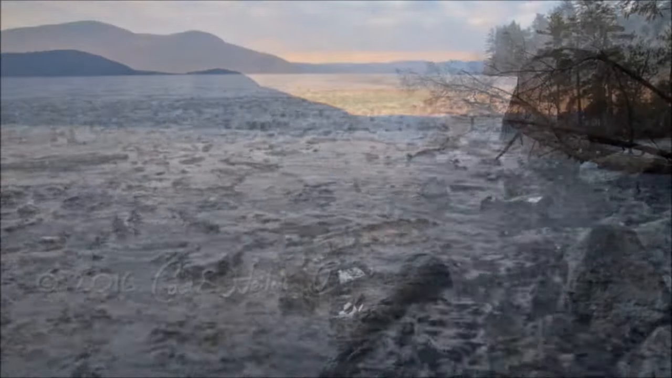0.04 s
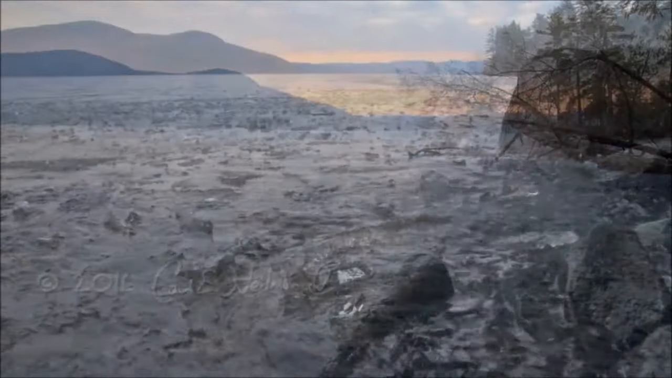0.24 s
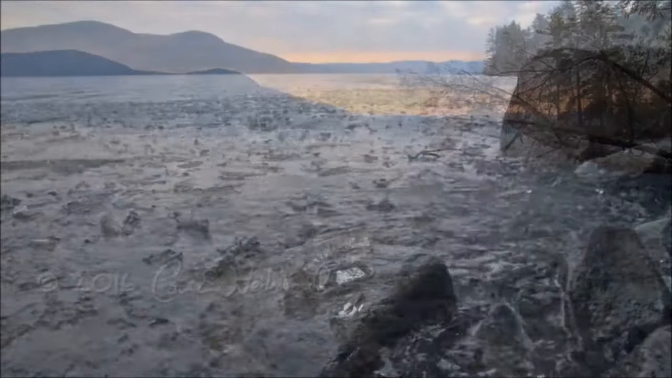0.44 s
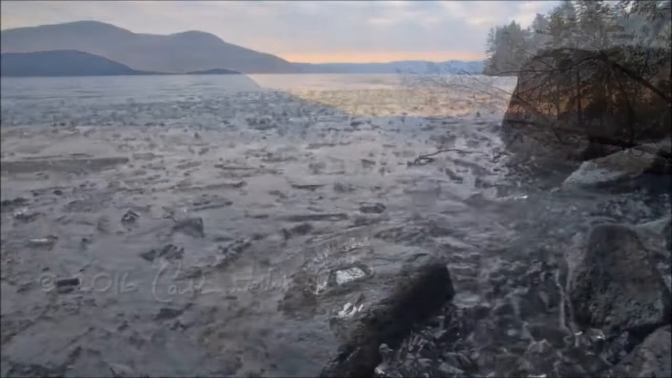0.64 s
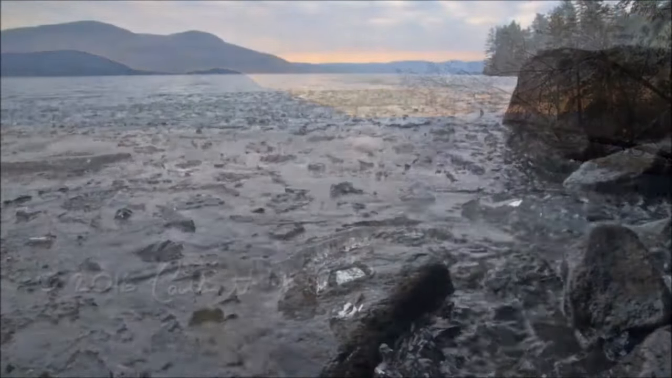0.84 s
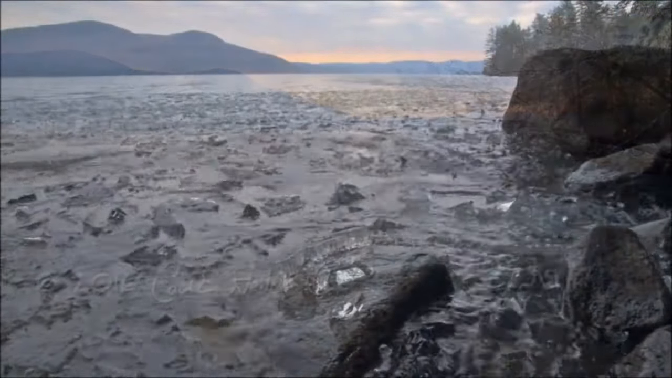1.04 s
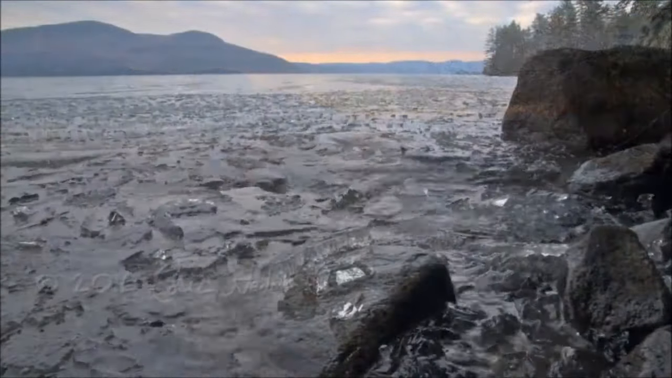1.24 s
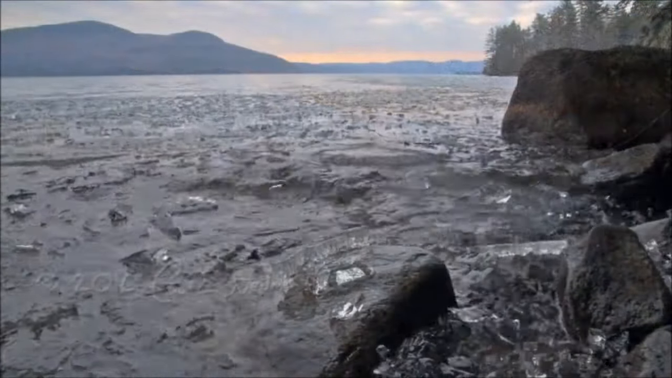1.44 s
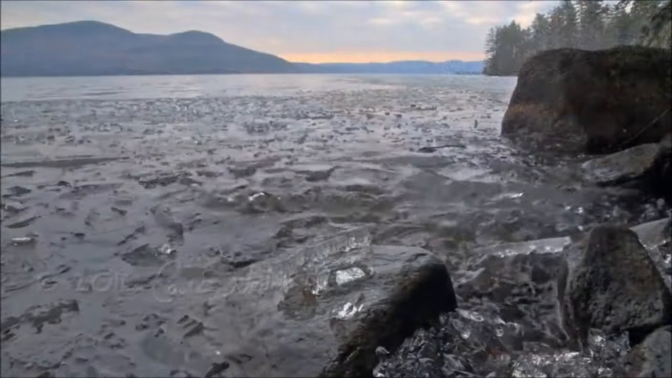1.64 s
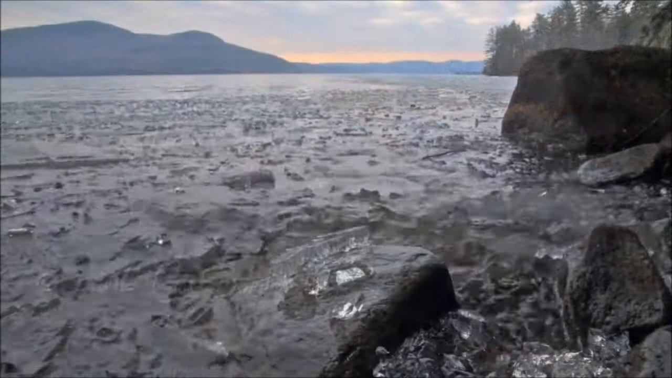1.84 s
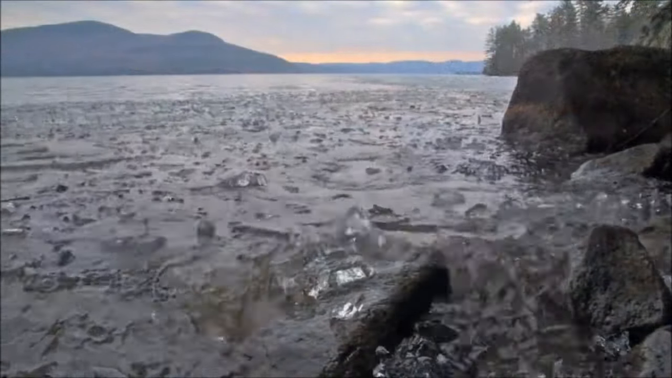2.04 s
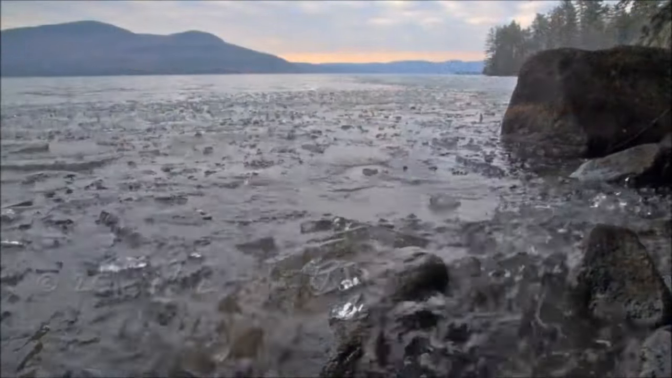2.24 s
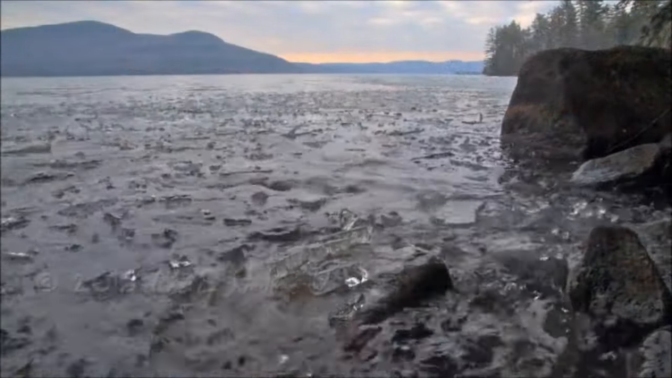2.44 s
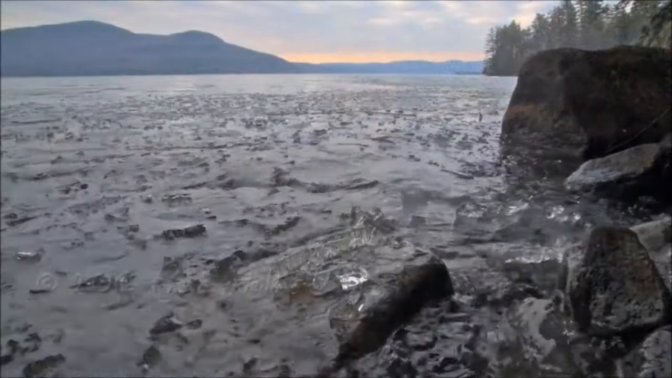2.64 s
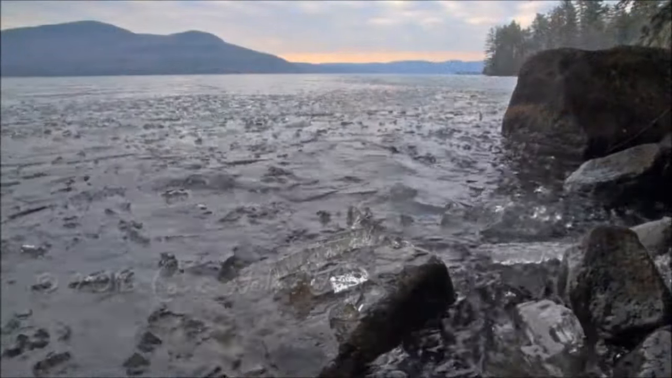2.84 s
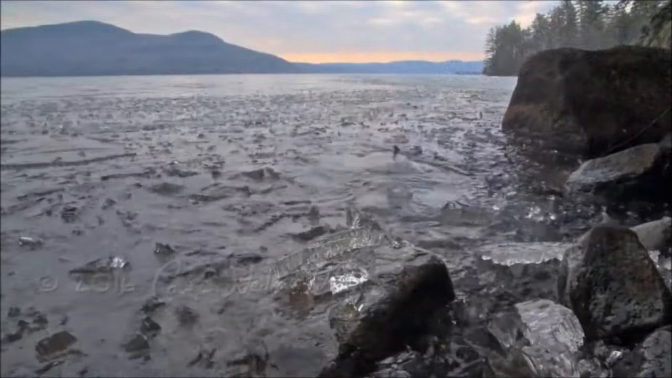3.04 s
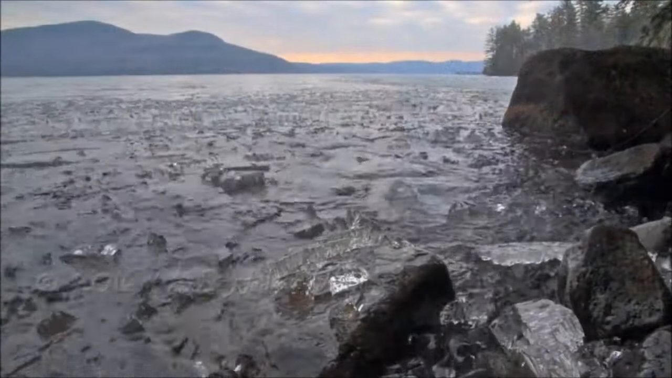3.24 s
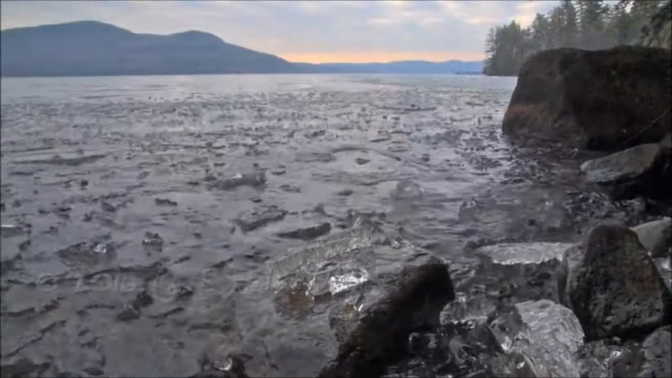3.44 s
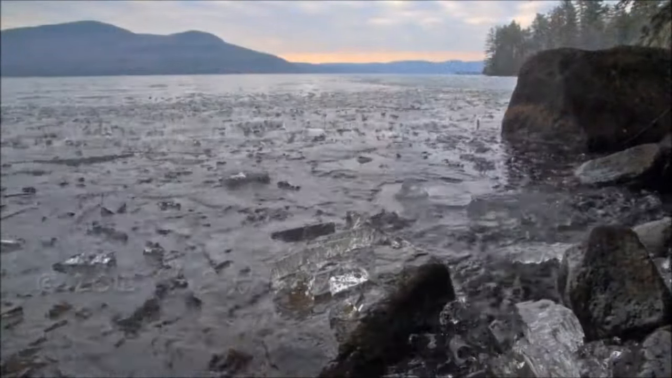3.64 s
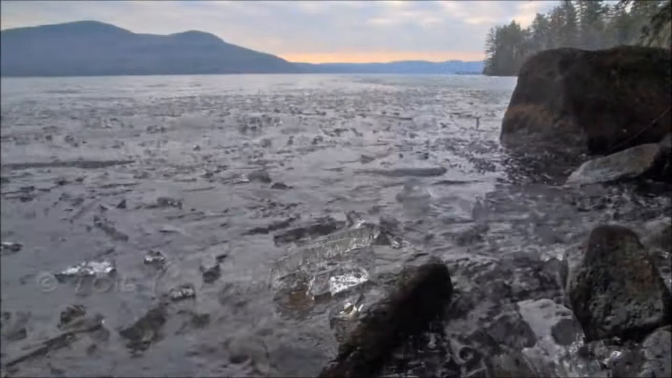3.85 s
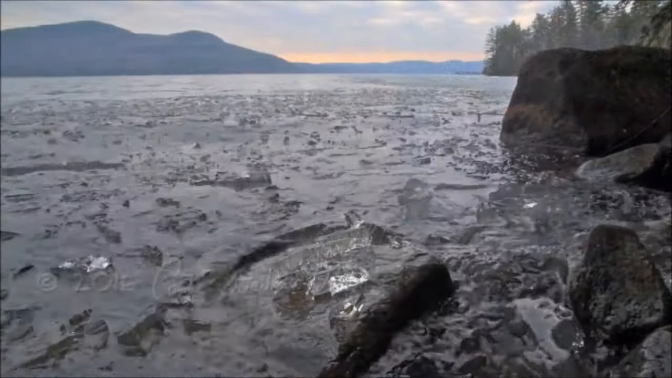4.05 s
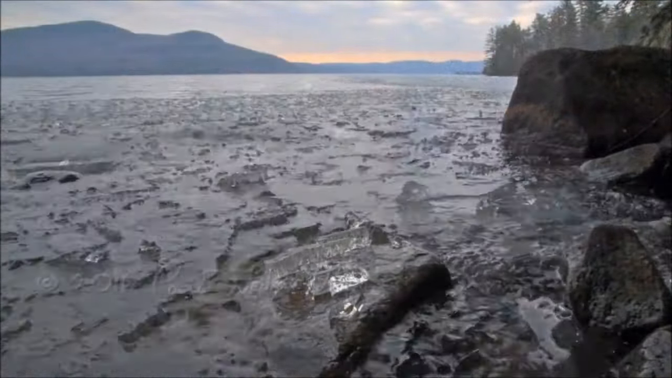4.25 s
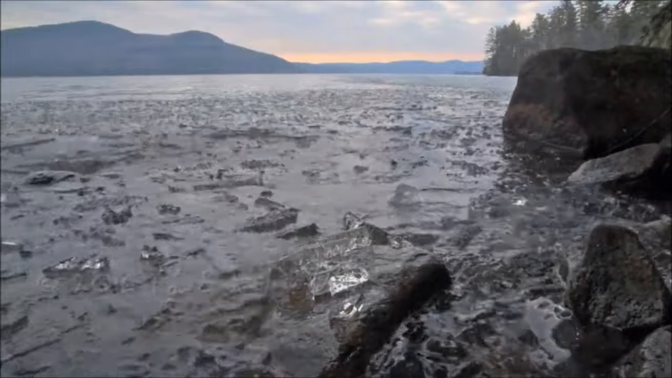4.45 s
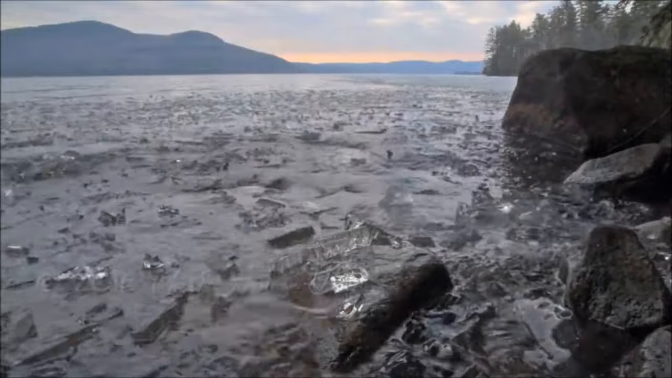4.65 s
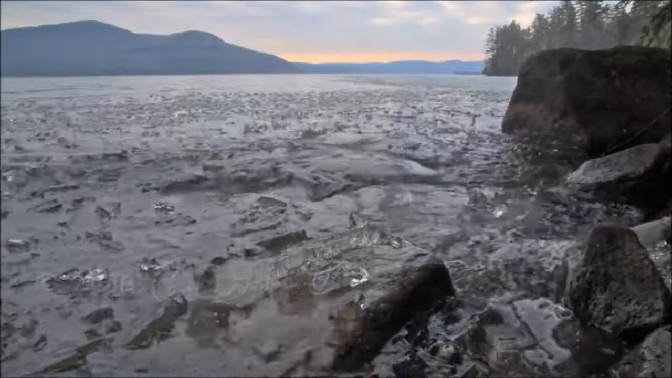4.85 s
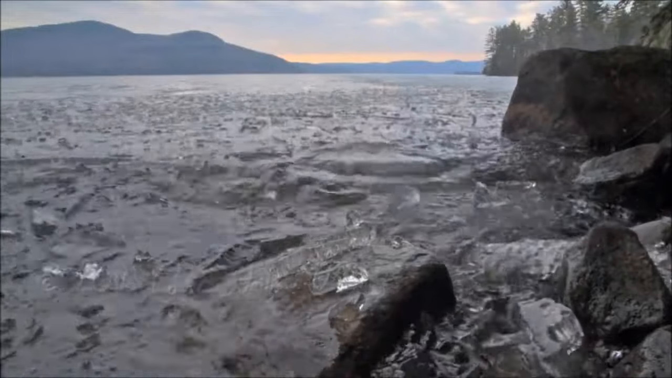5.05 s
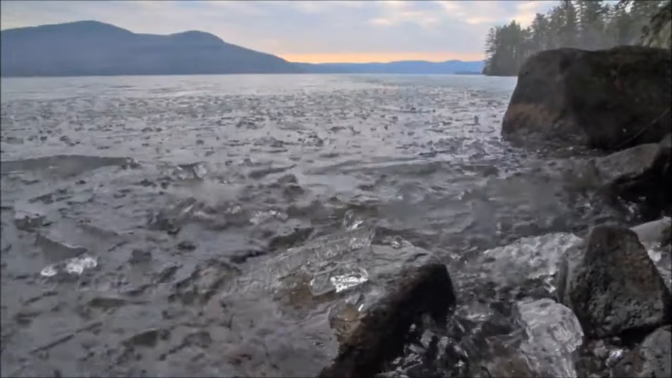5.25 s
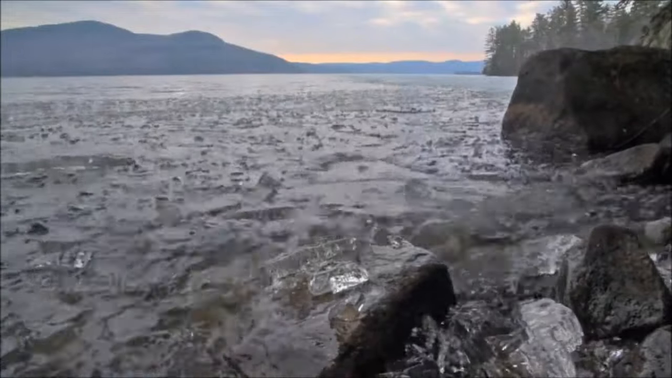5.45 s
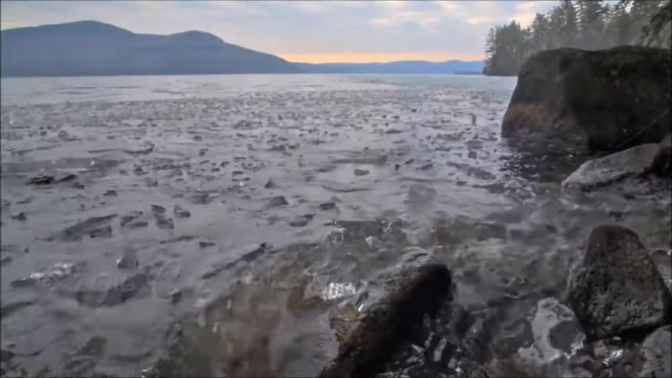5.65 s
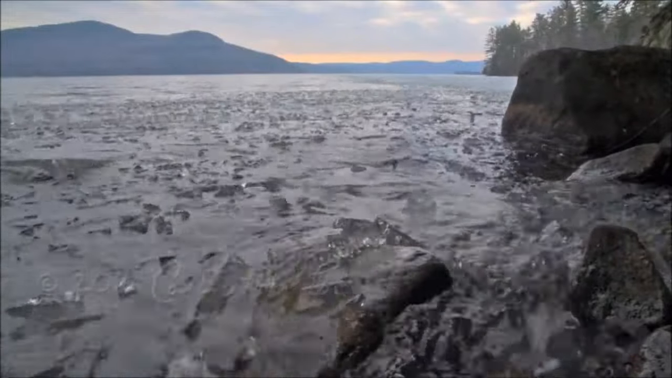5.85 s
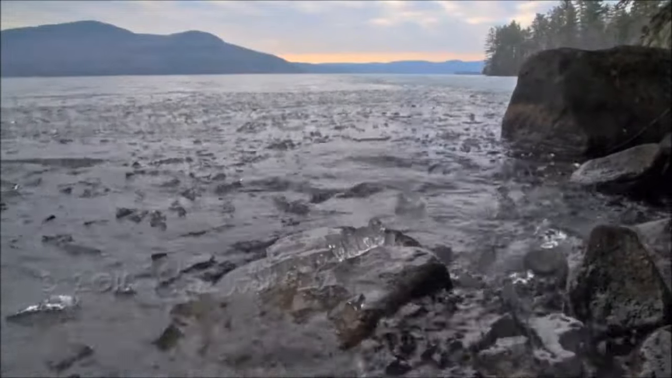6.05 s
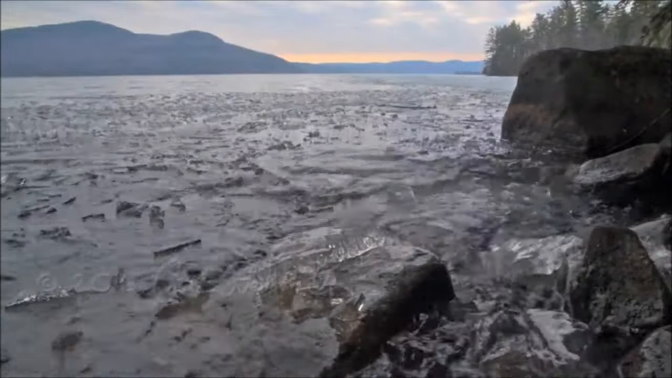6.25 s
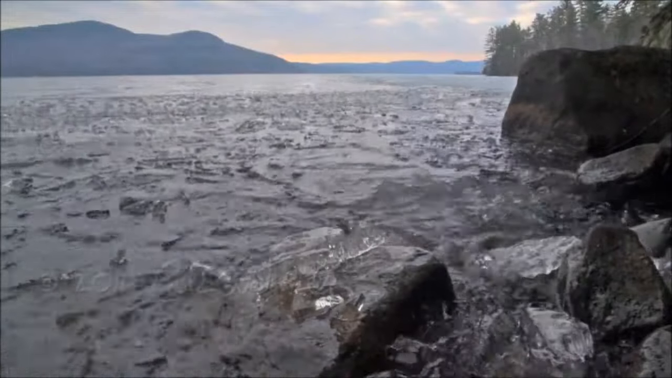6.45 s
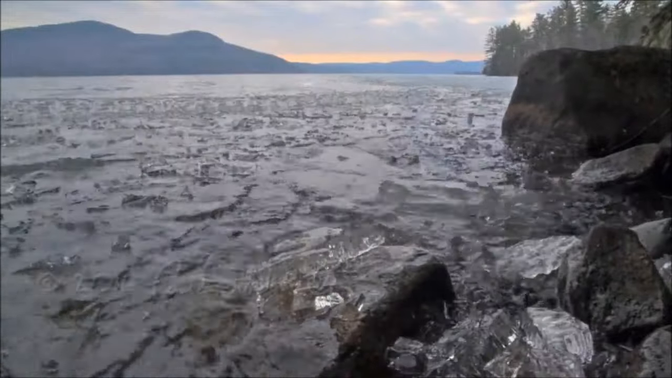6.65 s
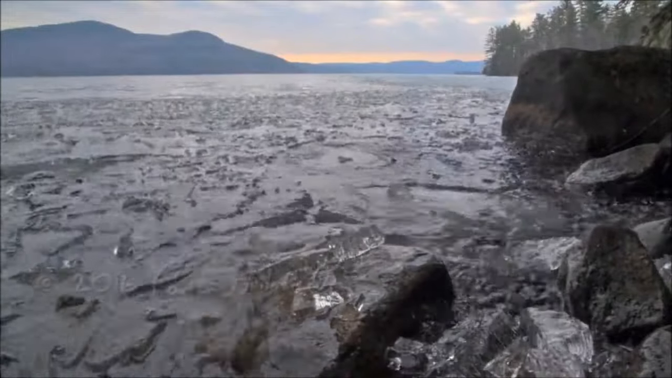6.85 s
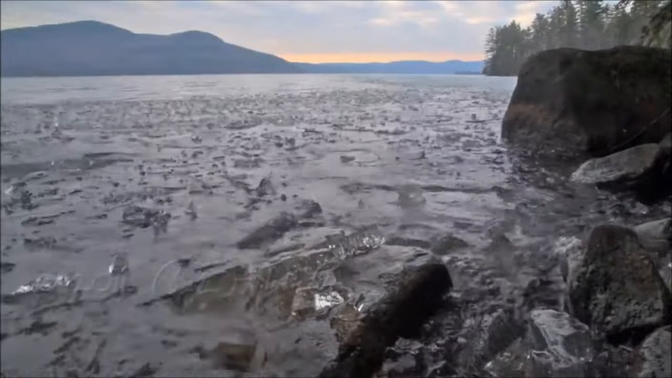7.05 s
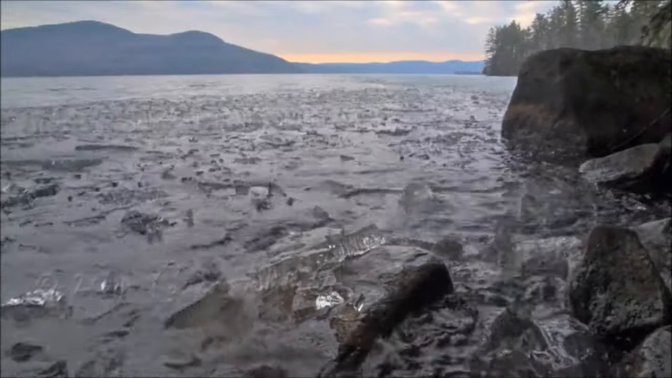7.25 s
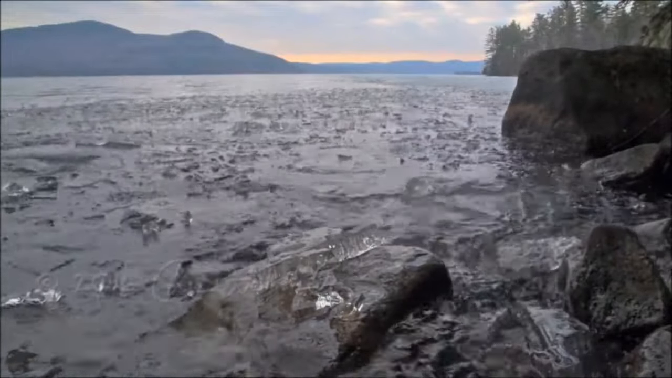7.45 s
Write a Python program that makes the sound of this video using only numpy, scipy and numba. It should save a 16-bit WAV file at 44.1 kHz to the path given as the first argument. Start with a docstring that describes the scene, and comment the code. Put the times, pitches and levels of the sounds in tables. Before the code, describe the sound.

Countless thin ice needles tinkle and rustle on a lake edge, swelling with each wavelet, while water gurgles and slaps softly between stones.

```python
"""A rocky lake shore: small waves push loose candle ice against the stones, before two spaced microphones.
Thousands of ice needles and thicker shards knock together, each a short dying sine; waves bring more.
Near crystals chime as ringing rods; knocks and smacks are a crack, a burst of noise and a short ring.
Underneath, water laps between the rocks: coloured noise, and trapped bubbles that plop with gliding pitch."""
import sys
import numpy as np
from scipy import signal
from scipy.fft import rfft, irfft
from scipy.io import wavfile
from scipy.ndimage import uniform_filter1d
from numba import njit

SR = 44100
rng = np.random.default_rng(int(sys.argv[2]) if len(sys.argv) > 2 else 0)


def output_pcm(signal):
    """Save a mono or channel-first signal as 16-bit PCM at the path in sys.argv[1].

    Samples are clipped to [-1, 1] before scaling.
    """
    pcm = np.clip(np.atleast_2d(signal).T, -1, 1) * 32767
    wavfile.write(sys.argv[1], SR, np.round(pcm).astype(np.int16))


N = 331191


def gain_of(db):
    """Turns decibels into a gain."""
    return 10 ** (np.asarray(db) / 20)


def evened(x):
    """Scales a sound to an average (rms) strength of 1."""
    return x / np.sqrt(np.mean(x ** 2) + 1e-20)


def read(points, hz):
    """Reads a table between its points, on a log-frequency axis."""
    f, value = np.transpose(points)
    return np.interp(np.log(hz + 1), np.log(f + 1), value)


def level(table, axis):
    """Turns one dB column of a time table into a gain for every sample."""
    rows = np.array(table)
    db = np.interp(np.arange(N) / SR, rows[:, 0], rows[:, axis])
    return gain_of(db)


def coloured(x, colour):
    """Filters a sound: each frequency gets the gain given in the colour table."""
    hz = np.fft.rfftfreq(N, 1 / SR)
    return irfft(rfft(x) * gain_of(read(colour, hz)), N)


def steadied(x, size):
    """Holds the slow level at 1 and keeps the quick grain; size is in samples."""
    power = (x ** 2).mean(0)
    power = uniform_filter1d(uniform_filter1d(power, size), size)
    return x / np.sqrt(abs(power) + 1e-9 * power.mean() + 1e-20)


def add(mix, s, sound):
    """Adds a stereo sound to the mix at a time in seconds."""
    first = max(round(s * SR), 0)
    part = mix[:, first:][:, :sound.shape[1]]
    part += sound[:, :part.shape[1]]


@njit
def rings(start, size, hz, t60, glide, rise):
    """Sums sines that swell over about `rise` cycles, lose 60 dB in t60 s and start to glide at octaves per s."""
    out = np.zeros(N)
    for k in range(len(start)):
        first = int(np.ceil(start[k] * SR))
        step = 2 * np.pi * hz[k] / SR
        # a spinning complex number: its imaginary part is the sine
        z = size[k] * np.exp(1j * step * (first - start[k] * SR))
        turn = np.exp(1j * step - np.log(1000) / (t60[k] * SR))
        bend = np.exp(1j * step * np.log(2) * glide[k] / SR)
        swell = 0.
        quick = 1 - np.exp(-hz[k] / (rise * SR))
        for i in range(max(first, 0), min(first + int(.8 * t60[k] * SR), N)):
            swell += (1 - swell) * quick
            out[i] += swell * z.imag
            z *= turn
            turn *= bend
    return out


MIC_LAG = 0.0003964  # s between the microphones, for a sound from straight left


def heard(s, db, hz, t60, pan_db, side, glide, rise):
    """Rings reach the nearer microphone earlier (side -1 right .. 1 left) and louder."""
    t60 = np.maximum(t60, .002)
    glide = glide * np.ones(len(s))
    balance = np.sqrt(np.cosh(pan_db * np.log(10) / 20))  # keeps the total power of both sides
    ears = []
    for ear in (1, -1):  # left, right
        arrival = s - ear * side * MIC_LAG / 2
        size = gain_of(db + ear * pan_db / 2) / balance
        ears.append(rings(arrival, size, hz, t60, glide, max(rise, .02)))
    return np.array(ears)


# how alike the two microphones hear far sounds: (frequency [Hz], likeness [0..1])
LIKENESS = [(20, .55), (60, 0.58), (130, 0.91), (300, 0.88), (700, 0.94), (1400, 0.8)]


def hiss():
    """Countless far sounds merge into a wash of noise, largely alike in both microphones at all pitches, least
    so in the deep bass."""
    same = np.clip(read(LIKENESS, np.fft.rfftfreq(N, 1 / SR)), -1, 1)
    a, b = rfft(rng.standard_normal((2, N)))
    return irfft(np.array([a, same * a + np.sqrt(1 - same ** 2) * b]), N)


def strike_times(stir, when):
    """Spreads random draws 0..1 over time, closer together where the stirring is stronger."""
    busy = np.cumsum(np.sqrt(stir))
    return np.interp(when, busy / busy[-1], np.arange(N) / SR)


def crowd(stir, count, low_hz, high_hz, t60, spread_db, width, glide, rise):
    """Random ringing bodies of all sizes; most are struck softly, a few hard."""
    when, pitch, force, damping, place, shade, bend = rng.random((count, 7)).T
    hz = low_hz + (high_hz - low_hz) * pitch
    # rings last from a quarter to four times t60, and less at high pitch
    life = t60 * 4 ** (2 * damping - 1) * np.sqrt(low_hz / hz)
    db = spread_db * np.minimum(-np.log(1 - force), 4) - 5 * np.log10(life / t60)
    width = np.clip(width, 0, 1)
    side = width * (2 * place - 1)
    pan_db = 7 * (side + width * (shade - .5))
    return heard(strike_times(stir, when), db, hz, life, pan_db, side, glide * (2 * bend - .5), rise)


def ticks(stir, count, spread_db):
    """Dry contacts: each is a few very short tones struck at once."""
    when, force, place, *pitches = rng.random((count, 7)).T
    db = spread_db * np.minimum(-np.log(1 - force), 5)
    side = 2 * place - 1
    s = strike_times(stir, when)
    life = np.full(count, .003)
    return sum(heard(s, db, 1500 + 13000 * p, life, 7 * side, side, 0, .1) for p in pitches)


LAP_RISE, LAP_FALL = .6, .9  # shares of a lap's or surge's length before and after its crest


def crests(rows, axis):
    """Power of laps or surges: each builds to its crest and drains away."""
    t, power = np.arange(0, N, 64) / SR, 0
    for row in rows:
        crest, length = row[0], row[-1]
        width = length * np.where(t < crest, LAP_RISE, LAP_FALL)
        power = power + gain_of(row[axis]) ** 2 * np.exp(-((t - crest) / width) ** 2)
    return np.interp(np.arange(N) / SR, t, power)


# how hard the slow swell stirs the floating ice: (time [s], relative level [dB])
SWELL_LEVEL = [(0, -37), (1.2, -37.5), (1.72, -33.5), (2.15, -30.5), (2.87, -29.5), (3.45, -31.5),
               (4.1, -32), (4.42, -33.5), (5.1, -31.5), (5.55, -29.5), (5.95, -28), (6.65, -27.5),
               (6.93, -31), (7.51, -31.5)]
# the raft of ice bunches up and rustles: (crest time [s], relative level [dB], length [s])
ICE_SURGES = [(0.02, -37, .04), (1.8, -34.5, .11), (2.08, -31, .08), (2.45, -28.5, .06), (2.7, -29.5, .13),
              (3.14, -27.5, .055), (3.29, -27.5, .07), (3.9, -33, .08), (4.2, -30.5, .13),
              (5.28, -28.5, .09), (5.42, -30, .07), (5.6, -30.5, .05), (6.58, -32, .06), (6.73, -28.5, .06),
              (7.18, -31, .14)]


def jostle():
    """How hard the ice is jostled: the power of the swell plus that of its surges."""
    return np.sqrt(level(SWELL_LEVEL, axis=1) ** 2 + crests(ICE_SURGES, axis=1))


# wavelets lapping into the rocks:
# (crest time [s], bubbling and shard level [relative dB], deep slosh level [relative dB], length [s])
WAVE_LAPS = [(0.45, -39.5, -57, .12), (1.38, -41.5, -46.5, .07), (1.58, -42, -53, .1),
             (1.8, -34.5, -49, .13), (2.07, -36, -58.5, .06), (2.22, -33.5, -56, .11),
             (2.44, -35.5, -49, .08), (2.87, -48, -47.5, .19), (3.12, -42, -58.5, 0.0607),
             (3.771, -36.5, -56, .09), (3.97, -36.5, -56, .045), (4.251, -42, -52, 0.11985),
             (4.56, -40, -48.5, 0.0701), (4.821, -37.5, -47, .09), (5.06, -35, -47, .11),
             (5.329, -33, -49.5, .17), (5.75, -35.5, -47, .08), (5.92, -36, -58.5, .06),
             (6.02, -33, -46, .09), (6.18, -37, -53.5, .07), (6.37, -36, -48, .16), (7.16, -36, -50, .14)]
CALM_DB = -37  # the swell between waves


def stirred(calm_db, follow, lap_db, axis):
    """A crowd grows with the jostling, and each lap adds to it by one of its level columns."""
    swell = gain_of(calm_db) * (jostle() / gain_of(CALM_DB)) ** follow
    return np.sqrt(swell ** 2 + gain_of(lap_db) ** 2 * crests(WAVE_LAPS, axis))


# where the ice is busiest: (time [s], left-right difference [dB])
ICE_LEAN = [(0, 0.5), (2.1, -1.5), (2.9, -.3), (3.35, 1.7), (5.2, 2.5), (6.3, -0.6), (6.85, 2), (7.51, 0.5)]


def drift():
    """The busiest ice shifts left and right as the waves pass."""
    lean = np.sqrt(level(ICE_LEAN, axis=1))
    return np.array([lean, 1 / lean])


def clumping(depth_db, size):
    """Crystals topple against each other in flurries: smoothed noise, over `size` samples, sways the level."""
    noise = rng.standard_normal(N)
    flurry = evened(uniform_filter1d(uniform_filter1d(noise, size), size))
    return evened(gain_of(depth_db * flurry))


# filter for the needles: (frequency [Hz], gain [dB])
NEEDLE_FILTER = [(600, -54), (2400, -14.5), (3300, -7), (4200, -10), (6400, -7), (8700, -8), (10000, -11.5),
                 (11500, -18), (13500, -22.5), (15500, -58)]


def needles(flurry):
    """Thin crystals: a fine, dense glassy fizz of tiny clinks and dry contacts, with a few longer tinkles."""
    stir = jostle()
    far = crowd(stir, count=40000, low_hz=2782, high_hz=15630, t60=.008, spread_db=2.0,
                width=1, glide=0, rise=1.5)
    near = crowd(stir, count=8000, low_hz=2800, high_hz=15000, t60=.02, spread_db=2.6,
                 width=1, glide=0, rise=2)
    ringing = crowd(stir, count=5500, low_hz=2800, high_hz=15000, t60=.06, spread_db=2.1,
                    width=1, glide=0, rise=4)
    contacts = ticks(stir, count=5000, spread_db=2.7)
    tinkle = evened(far) + gain_of(-1.5) * evened(near) + gain_of(-4) * evened(ringing)
    tinkle = tinkle + gain_of(-3) * evened(contacts) + gain_of(-5) * hiss()
    fizz = steadied(coloured(tinkle, NEEDLE_FILTER), size=2500)
    return gain_of(0.04) * drift() * stir * flurry * fizz


# filter for the shards: (frequency [Hz], gain [dB])
SHARD_FILTER = [(300, -62), (1000, -6), (1280, -16.5), (1550, -15.5), (2000, -12.5), (2400, -11),
                (2850, -11.5), (3500, -20), (4800, -8), (9000, -27.5)]
# how the shards answer the water: (calm level [dB], growth [dB per dB of swell], level against a lap [dB])
SHARD_STIR = (-35.5, .46, 0.3044)


def shards(flurry):
    """Thick pieces of ice clink lower and longer than the needles."""
    stir = stirred(*SHARD_STIR, axis=1)
    far = crowd(stir, count=15000, low_hz=1224, high_hz=4398, t60=.016, spread_db=2.0,
                width=1, glide=0, rise=.8)
    near = crowd(stir, count=1600, low_hz=1250, high_hz=3300, t60=.055, spread_db=2.3,
                 width=1, glide=0, rise=1)
    contacts = ticks(stir, count=1400, spread_db=1.0)
    clink = evened(far) + gain_of(-5) * evened(near) + gain_of(-4) * evened(contacts) + gain_of(-5) * hiss()
    clink = steadied(coloured(clink, SHARD_FILTER), size=3000)
    return gain_of(-1.94) * drift() * stir * flurry ** .5 * clink


# the water draws back from the rocks between waves: (time [s], bubbling change [dB], length [s])
WATER_EBBS = [(0.754, -1.5, .15), (3.498, -5, .18), (6.851, -3, .14)]


def ebbing():
    """Bubbling quietens as the water draws back."""
    t = np.arange(N) / SR
    return gain_of(sum(db * np.exp(-((t - s) / length) ** 2) for s, db, length in WATER_EBBS))


# filter for the bubbling: (frequency [Hz], gain [dB])
BUBBLE_FILTER = [(100, -34), (250, -12), (400, -13), (520, -6.5), (680, -3.5), (800, -0.1), (930, -1),
                 (1130, -3), (1430, 2), (1750, -2.5), (2400, 2), (5000, -49)]
# how bubbling answers the water: (calm level [dB], growth [dB per dB of swell], level against a lap [dB])
BUBBLE_STIR = (-40.0, .2, .5)


def bubbling():
    """Lapping water traps bubbles, most rising in pitch as they near the surface, and knocks lumps together."""
    stir = stirred(*BUBBLE_STIR, axis=1) * ebbing()
    bubbles = crowd(stir, count=4200, low_hz=280, high_hz=2100, t60=.042, spread_db=2.2,
                    width=.8, glide=4, rise=.2)
    clacks = crowd(stir, count=3000, low_hz=400, high_hz=2100, t60=.008, spread_db=1.6,
                   width=.8, glide=0, rise=.1)
    water = evened(bubbles) + gain_of(-6) * evened(clacks) + gain_of(1.5) * hiss()
    return gain_of(1.0) * stir * steadied(coloured(water, BUBBLE_FILTER), size=2000)


# filter for the slosh: (frequency [Hz], gain [dB])
SLOSH_FILTER = [(20, -11), (45, -13.5), (80, -9), (135, -3), (200, -2.5), (290, 2.5), (400, 0.5), (650, 1),
                (1500, -24.5)]
# how the slosh answers the water: (calm level [dB], growth [dB per dB of swell], level against a lap [dB])
SLOSH_STIR = (-53, .4, -0.315)


def slosh():
    """The dull wash of moving water, with deep glugs from the gaps between rocks."""
    stir = stirred(*SLOSH_STIR, axis=2)
    glugs = crowd(stir, count=900, low_hz=110, high_hz=480, t60=.05, spread_db=2.5,
                  width=.4, glide=1.5, rise=.5)
    wash = evened(coloured(hiss(), SLOSH_FILTER))
    water = wash + gain_of(-6.0) * evened(coloured(glugs, SLOSH_FILTER))
    return gain_of(3) * stir * steadied(water, size=5000)


CLATTER_RISE = .3  # share of its decay time in which a clatter builds
CRACK_S = 0.00099  # s from first touch to the hardest contact


def impacts(rows, octaves, bright, crack_db, ring_db, cycles):
    """A sharp crack and a burst of clatter around `bright` times the pitch, and a quickly damped ring."""
    out = np.zeros((2, N))
    t = np.arange(2048) / SR
    hz = np.fft.rfftfreq(2048, 1 / SR) + 1
    same = np.clip(read(LIKENESS, hz), -1, 1)
    for s, db, pitch_hz, pan_db, decay in rows:
        a, b = rfft(rng.standard_normal((2, 2048)))
        noise = np.array([a, same * a + np.sqrt(1 - same ** 2) * b])
        band = np.exp(-.5 * (np.log2(hz / (bright * pitch_hz)) / octaves) ** 2)
        clatter = evened(irfft(band * noise))
        ears = gain_of(db) * evened(gain_of(np.array([[pan_db], [-pan_db]]) / 2))
        burst = (1 - np.exp(-t / (CLATTER_RISE * decay))) * np.exp(-t / decay)
        add(out, s, ears * clatter * burst / burst.max())
        # the crack is a single pulse with its peak in the middle
        crack = np.fft.fftshift(irfft(band))
        add(out, s + CRACK_S - t[-1] / 2, gain_of(crack_db) * ears * crack / crack.max())
    s, db, pitch_hz, pan_db, decay = np.transpose(rows)
    return out + heard(s, db + ring_db, pitch_hz, cycles / pitch_hz, pan_db, np.tanh(pan_db / 15), 0, 0.74)


# hard ice-on-ice knocks:
# (time [s], relative level [dB], pitch [Hz], left-right difference [dB], clatter decay to 1/e [s])
ICE_KNOCKS = [(0.0245, -30, 5600, -7, .003), (0.8915, -35, 6330, -2, .002),
              (0.9905, -30, 4120, 2.5, 0.0033), (0.9925, -31, 9000, -5.5, .002),
              (1.063, -27, 5830, -11, 0.003), (1.064, -33, 8900, -10, .002),
              (1.3362, -21.5, 8400, -1, 0.0038), (1.3395, -31, 5000, -3, .0015),
              (1.9635, -20, 6300, -12, 0.0046), (2.055, -24, 4120, -2.5, .002),
              (2.9245, -20.5, 7450, 9, 0.0028), (3.0021, -24.5, 8400, -5, .003),
              (3.3655, -12.5, 6950, 3, 0.0035), (3.5361, -23, 8700, 8.5, .003),
              (3.9835, -22, 7300, 9, 0.0027), (4.033, -24, 7150, 11, 0.0025),
              (4.038, -23, 5170, 10.5, 0.0028), (4.187, -24, 4950, -1, 0.0018),
              (4.9965, -20, 9450, -8.5, 0.0037), (5.4795, -21, 8800, 0, 0.0022),
              (5.647, -9.5, 8670, 5.5, .003), (6.8985, -24, 5070, 2.5, .001),
              (6.9392, -19.5, 7440, -2.5, .002), (7.331, -9.5, 8240, 6, 0.0026)]


def knocks():
    """Hard ice hits ice: a bright crack and clatter with a ring of a few dozen cycles."""
    return gain_of(-2.5) * impacts(ICE_KNOCKS, octaves=0.65, bright=0.93, crack_db=8, ring_db=12.0, cycles=73)


# near crystals ringing:
# (time [s], relative level [dB], pitch [Hz], left-right difference [dB], ring time to -60 dB [s])
CRYSTAL_CHIMES = [(0.28, -23, 8700, 2, .025), (0.6, -23, 9390, 7.5, 0.023), (0.9918, -17, 4300, 0.5, 0.018),
                  (1.0635, -19.5, 4650, -1.5, 0.055), (1.0637, -20, 5680, -10, 0.039),
                  (1.0635, -19, 6530, -5, 0.024), (1.61, -20, 2820, 7, 0.037),
                  (1.6236, -4, 12700, -8, .017), (1.729, -15, 2815, 11, 0.1),
                  (1.7585, -26, 4100, 1.5, .045), (1.7807, -12, 2170, 2, 0.042),
                  (1.779, -18, 1443, -2, 0.1), (1.81, -24, 4070, -1.5, 0.046), (1.877, -23, 1368, -2, 0.13),
                  (1.835, -13, 9900, -12, 0.016), (2.1835, -9.5, 4000, -1.5, 0.039),
                  (2.185, -4, 3080, -4, .022), (2.2495, -17, 3450, 1, .025), (2.308, -14, 1765, -5, .03),
                  (2.3525, -13, 6500, -8.5, 0.034), (2.46, -14.5, 3995, 9, .06), (2.492, -16, 3920, 5, .05),
                  (2.6423, -13, 8260, 15, .026), (2.646, -16, 3240, -10, 0.027),
                  (2.696, -14, 4480, 14, .025), (2.8915, -13, 10300, -8.5, 0.019),
                  (2.92, -22, 1680, 0, 0.026), (3.119, -15.5, 3530, -1.5, .03), (3.261, -16, 6590, 9, .025),
                  (3.288, -17, 3830, 1, .03), (3.152, -15, 5940, 14, 0.028), (3.169, -5, 5960, 18, 0.028),
                  (3.2762, -14.5, 4570, 9, .06), (3.5928, -15, 9340, 13, .023),
                  (3.695, -15, 5030, -2, .043), (3.727, -18, 6500, 8.5, .025), (3.765, -15, 4480, 3.5, .03),
                  (3.91, -19, 3160, 21, 0.087), (3.9588, -13, 3220, 17, 0.043),
                  (4.634, -17, 5100, 3.5, .03), (4.862, -15, 2690, 8, 0.034),
                  (4.8813, -18, 8000, 7.5, .027), (5.072, -16.5, 5840, 5.5, 0.032),
                  (5.086, -21, 3200, 6.5, .06), (5.124, -11, 2210, 4, .035),
                  (5.142, -11.5, 2800, 7.5, 0.065), (5.152, -15, 2990, 8, .04),
                  (5.165, -14, 2750, 7.5, 0.065), (5.6972, -14, 2090, 2.5, 0.093),
                  (5.69, -13, 1420, 7, .05), (5.752, -20, 2110, 1, 0.069), (5.815, -19, 2200, 4.5, 0.13),
                  (6.008, -19, 1340, 2, 0.11), (6.373, -22.5, 1315, 5, 0.15), (6.487, -14, 7760, 13, .022),
                  (6.624, -15, 7800, 15, .022), (6.728, -16, 5340, 5, .025),
                  (6.7373, -11, 2770, -3.5, 0.05), (7.0948, -14, 3300, 16, 0.047),
                  (7.148, -23, 4100, 11, .07), (7.1921, -18, 4100, 11, .053), (7.255, -14, 6100, -11, .025),
                  (7.295, -16, 8400, 4, 0.044), (7.41, -18, 2800, 7.5, 0.096)]
# a crystal is not round: it also bends the other way, higher by 0.4 to 1.76 times this share
TWIN_SPLIT, TWIN_DB = 0.0266, -19
EDGE_HZ = 15750  # top of the sound that is kept


def chimes():
    """A near crystal rings as a free rod: two close bending modes beat, with a weaker, shorter overtone."""
    s, db, hz, pan_db, t60 = np.transpose(CRYSTAL_CHIMES)
    side = np.tanh(pan_db / 10)
    main = heard(s, db, hz, t60, pan_db, side, 0, 3.4)
    twin_hz = hz * (1 + TWIN_SPLIT * rng.uniform(0.4, 1.76, len(s)))
    twin = heard(s, db + TWIN_DB, twin_hz, t60, pan_db, side, 0, 2)
    second_hz = hz * 2.756  # second bending mode of a free rod
    second_db = np.where(second_hz < EDGE_HZ, db - 19, -np.inf)
    overtone = heard(s, second_db, second_hz, t60 * .6, pan_db, side, 0, 2)
    return main + twin + overtone


# water and floating ice smacking a rock: (time [s], relative level [dB], pitch of the trapped air [Hz],
# left-right difference [dB], clatter decay to 1/e [s])
ROCK_SMACKS = [(0.3622, -19.5, 820, 0.5, 0.0031), (0.4762, -25.5, 2180, -2, 0.0035),
               (0.499, -21, 800, 0, 0.0033), (1.273, -21, 1010, -2, 0.0019),
               (1.2985, -21, 1500, -4, 0.0023), (1.727, -19.5, 1220, -1, 0.0021),
               (1.7635, -26, 960, -3, 0.0036), (1.774, -18.5, 503, -3, .003),
               (1.781, -30, 1410, -3, 0.0086), (1.847, -22, 1090, 2, .004), (1.8555, -15, 1750, -4, 0.0043),
               (1.8785, -22, 1340, -4, 0.0073), (1.8795, -16, 594, -1, 0.0019),
               (2.01, -18, 1300, -6, 0.0029), (2.066, -18, 1420, 0, .004), (2.159, -17, 1900, -5, 0.0033),
               (2.1803, -12, 1210, 3, 0.0014), (2.181, -10.5, 2820, 0, 0.0022),
               (2.1835, -12.5, 1620, -4, 0.003), (2.2357, -18, 1100, -2, 0.0014),
               (2.2357, -12, 2690, -7, 0.0017), (2.2583, -14, 2300, -2, 0.0016),
               (2.3075, -16, 1810, -9, .004), (3.777, -13, 1460, -14, 0.0025),
               (3.788, -21, 1300, -4, 0.0036), (3.9822, -12.5, 1464, 15, 0.0024),
               (4.428, -20, 1190, 0, 0.0062), (4.7892, -13.5, 1100, 2, 0.0019),
               (4.8152, -13, 2680, 14, 0.0014), (4.8475, -14, 800, -1, 0.0016),
               (4.8885, -19, 1270, 0, .0015), (4.9612, -14.5, 1360, 3, 0.0018),
               (4.9615, -21, 2400, 10, 0.0017), (5.071, -20, 1450, 1, 0.0027), (5.094, -20, 566, 3, 0.0021),
               (5.1805, -21.5, 660, 2, 0.0024), (5.6405, -10.5, 2290, 4, 0.0047),
               (5.692, -14, 1350, -2, 0.0071), (5.7245, -12, 2300, -3, 0.0044),
               (5.7375, -17.5, 880, 1, 0.0034), (5.827, -19.5, 1500, 2, .003),
               (5.891, -25.5, 1000, -5, .004), (5.945, -20, 1390, 3, 0.0035), (5.987, -19, 1190, 4, 0.0064),
               (5.999, -16, 2700, -7, 0.0046), (6.0065, -28, 500, 1, 0.0041),
               (6.0245, -10.5, 1010, 1, 0.0025), (6.0635, -22, 1400, -1, .005),
               (7.005, -18, 1230, -5, 0.0042)]
# so small a splash carries no deep bass: (frequency [Hz], gain [dB])
SMACK_FILTER = [(60, -13), (350, -2.5)]


def smacks():
    """Water and ice slap a rock: a duller clatter, and a short ring of trapped air."""
    slaps = impacts(ROCK_SMACKS, octaves=0.74, bright=0.99, crack_db=2.5, ring_db=8, cycles=10.3)
    return gain_of(-4.5) * coloured(slaps, SMACK_FILTER)


# near bubbles:
# (time [s], relative level [dB], starting pitch [Hz], left-right difference [dB], starting glide [octaves/s])
BUBBLE_PLOPS = [(0.374, -28.5, 950, 2, 4.5), (0.4042, -22.5, 817, 3, 3), (0.465, -27.5, 490, 0, 3.5),
                (0.5006, -24.5, 567, -3, 2), (0.514, -28, 1580, 2, -1), (1.2735, -27, 505, -2, 13),
                (1.373, -44, 276, 0, 3), (1.706, -24, 700, 0, -2), (1.741, -19, 1470, 0, 8),
                (1.889, -18, 1350, -5, 4), (1.7813, -26.5, 520, 1, 4), (1.781, -24, 1450, 1, -12),
                (2.075, -12.5, 1440, -9, 3), (2.141, -22, 764, -3, 0), (2.153, -19, 990, 1, 2),
                (2.186, -18, 1450, -2, -6), (2.1836, -4.5, 895, 0, -11.5), (2.193, -17, 713, 0, -2),
                (2.284, -24.5, 522, 0, 1), (2.327, -22, 1180, 0, -2), (2.2368, -17, 501, 0, 6),
                (2.401, -17.5, 1194, -5, -1), (2.85, -39.5, 151, 2, 0), (3.429, -22, 990, 12, -2),
                (3.9604, -21, 1020, 10, 5), (4.7282, -20.5, 780, 9, 6), (4.875, -20, 940, 0, 2),
                (4.986, -16.5, 1360, 2, 2), (5.005, -20, 935, 1, -3), (5.047, -17.5, 1270, 3, 1),
                (5.0944, -21.5, 850, 1, -11), (5.02, -25, 760, 3, -11), (5.769, -25, 924, 1, 4),
                (5.893, -21, 1080, 1, 17), (5.934, -19, 1440, 3, -3), (5.976, -23.5, 411, 0, 11.5),
                (6.005, -20, 483, 1, 9), (6.007, -19, 885, 0, 10), (6.023, -17, 990, 0, 7),
                (6.036, -18, 1650, 3, 5), (6.074, -17.5, 670, 1, 6), (6.0573, -15.5, 950, -1, 0),
                (6.0645, -16, 1380, 0, -1), (6.09, -24, 864, 0, 2), (6.0654, -19, 727, -1, 1.5),
                (6.1856, -20, 846, -1, -2), (6.21, -20, 900, 2, 0), (6.29, -37, 132, 0, 6),
                (6.5288, -19, 816, 6, -1), (7.0513, -22.5, 520, -2, 16), (7.074, -28.5, 407, 2, 3),
                (7.1929, -21, 1247, 10, 0), (7.224, -21.5, 1200, 2, 0), (7.375, -23, 1180, 5, -7)]
BUBBLE_CYCLES = 46  # a bubble falls by 60 dB in this many cycles of its starting pitch


def plops():
    """Large bubbles close by; the deeper the pitch, the longer they ring."""
    s, db, hz, pan_db, glide = np.transpose(BUBBLE_PLOPS)
    return heard(s, db, hz, BUBBLE_CYCLES / hz, pan_db, np.tanh(pan_db / 15), glide, 0.41)


# how long the shore echoes: (frequency [Hz], time to fall 60 dB [s])
SHORE_DECAY = [(200, 0.14), (1000, 0.079), (4000, 0.19), (14000, 0.031)]


def shore(x):
    """Boulders scatter the sound: sparse random echoes that die away at each frequency's own pace."""
    taps = rng.standard_normal((2, 12000))
    taps = taps * (rng.random((2, 12000)) < .04) * (np.arange(12000) > 150)
    hz, t, z = signal.stft(taps, SR, nperseg=256)
    fade = gain_of(-60 * t / read(SHORE_DECAY, hz)[:, None])
    tail = signal.istft(z * fade, SR, nperseg=256)[1]
    return signal.fftconvolve(x, tail / np.linalg.norm(tail[0]), axes=1)[:, :N]


# treble lost on the way to the microphones: (frequency [Hz], gain [dB])
AIR_LOSS = [(9500, -3), (12000, -16), (15500, -22)]


def scene():
    """The drifting ice field and the water, with the near events and their echoes on top."""
    flurry = clumping(depth_db=.85, size=600) * clumping(depth_db=.85, size=100)
    field = needles(flurry) + shards(flurry) + bubbling() + slosh()
    near = coloured(knocks() + chimes() + smacks() + plops(), AIR_LOSS)
    return field + near + gain_of(-13) * shore(near)


LIMIT_DB, LIMIT_ABOVE_HZ, RECOVER_DB_PER_S = -17, 1600, 41  # the limiter listens to the treble
SPARED_HZ = 1220  # and leaves the sound below this alone


def limited(x):
    """A sharp treble peak pulls the highs down at once; the gain then creeps back."""
    treble = signal.sosfilt(signal.butter(2, LIMIT_ABOVE_HZ, "highpass", fs=SR, output="sos"), x)
    power = uniform_filter1d((treble ** 2).mean(0), size=100)
    power_db = 10 * np.log10(abs(power) + 1e-12)
    recovery = np.arange(N) / SR * RECOVER_DB_PER_S
    # each peak is remembered, then forgotten at the recovery speed
    held_db = np.maximum.accumulate(power_db + recovery) - recovery
    over_db = np.maximum(held_db - LIMIT_DB, 0)
    low = signal.sosfiltfilt(signal.butter(2, SPARED_HZ, fs=SR, output="sos"), x)
    return low + (x - low) * gain_of(-uniform_filter1d(over_db, size=50))


def record(dry):
    """The microphones' bass cut, the limiter, then the band limit."""
    thinned = signal.sosfilt(signal.butter(2, 35, "highpass", fs=SR, output="sos"), dry)
    band_limit = signal.firwin(511, EDGE_HZ, window=("kaiser", 9), fs=SR)
    return signal.oaconvolve(limited(thinned), band_limit[None], "same")


dry = scene()
out = record(dry)
output_pcm(out)
```